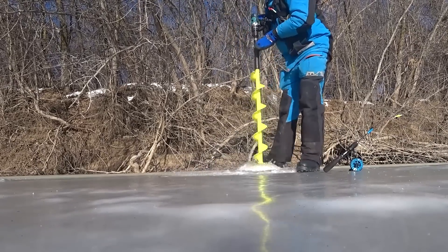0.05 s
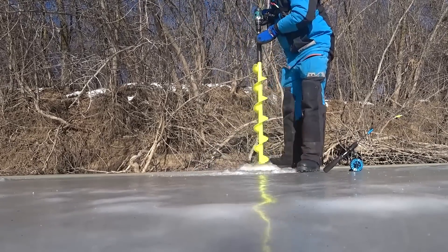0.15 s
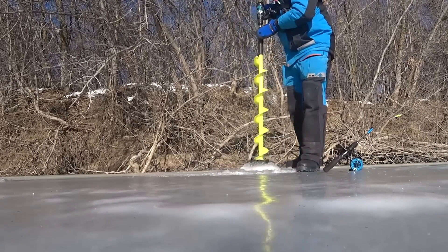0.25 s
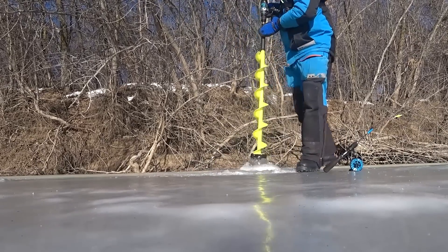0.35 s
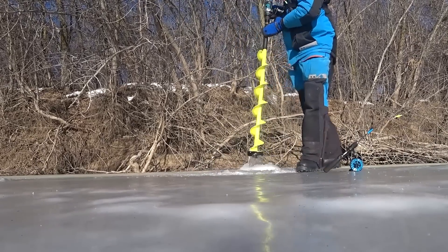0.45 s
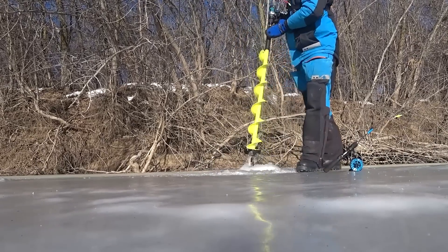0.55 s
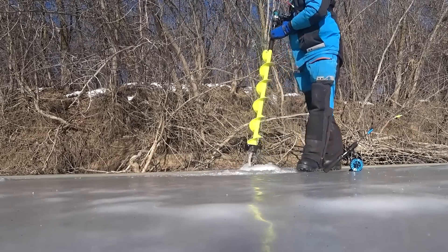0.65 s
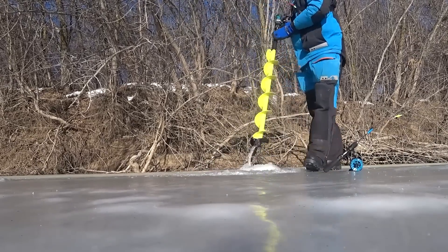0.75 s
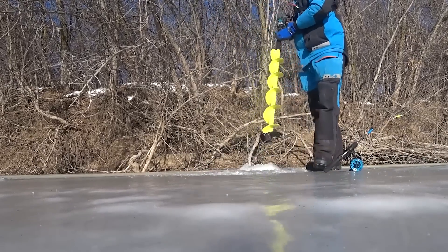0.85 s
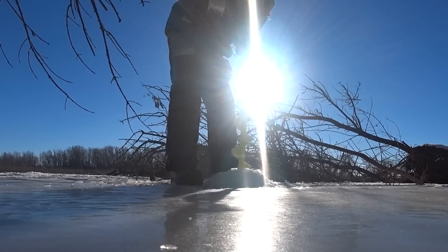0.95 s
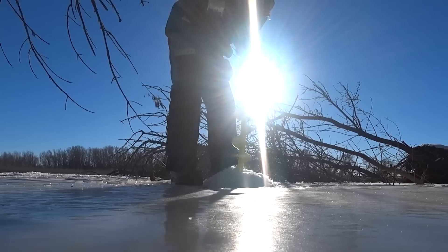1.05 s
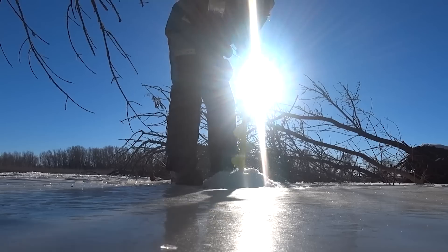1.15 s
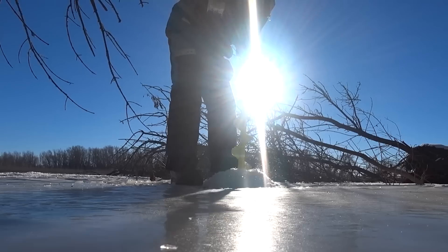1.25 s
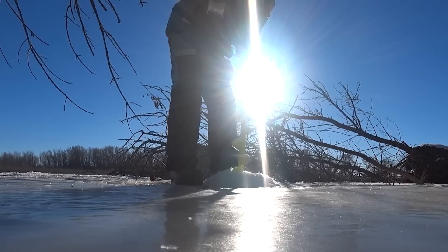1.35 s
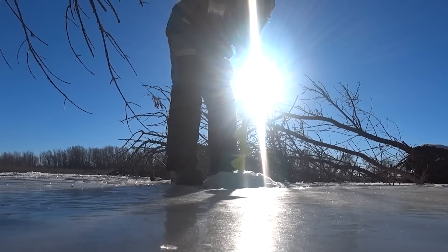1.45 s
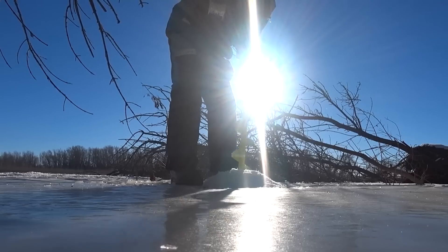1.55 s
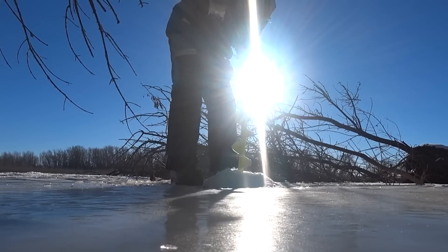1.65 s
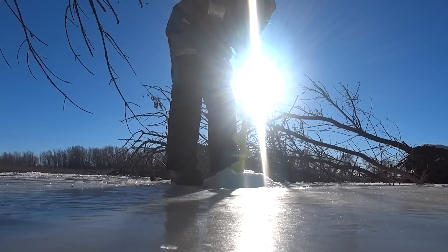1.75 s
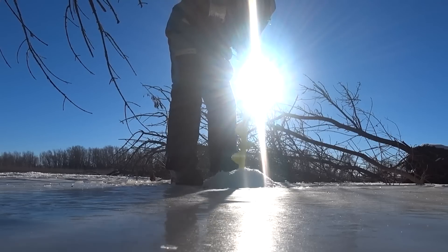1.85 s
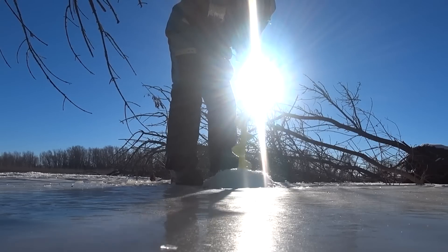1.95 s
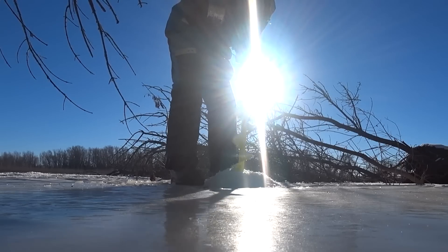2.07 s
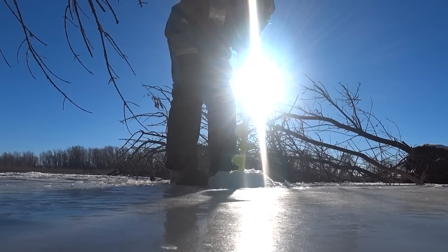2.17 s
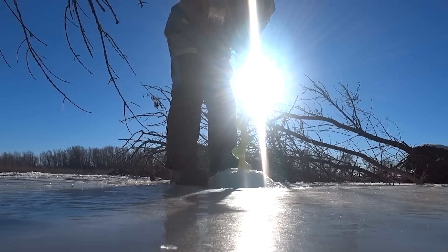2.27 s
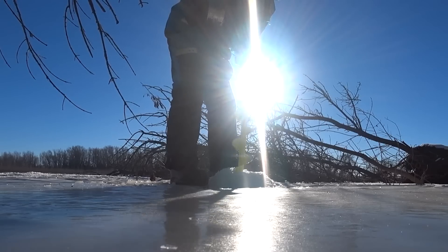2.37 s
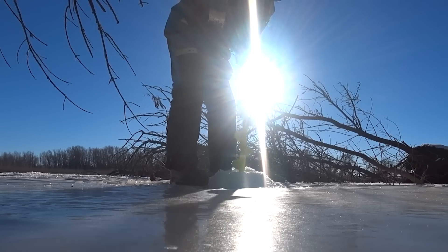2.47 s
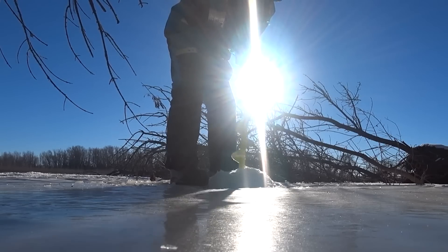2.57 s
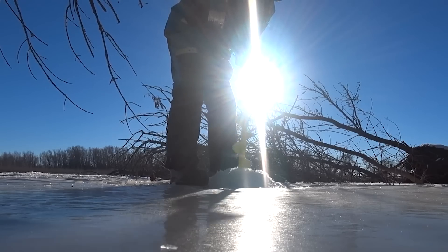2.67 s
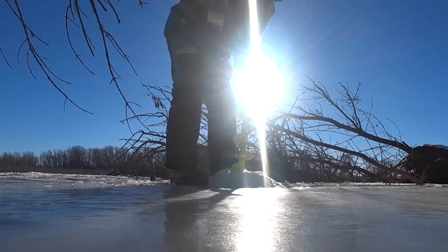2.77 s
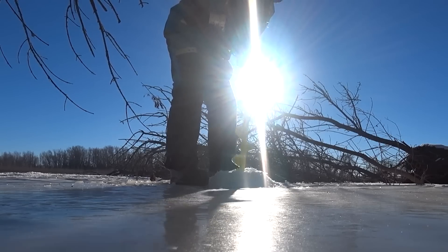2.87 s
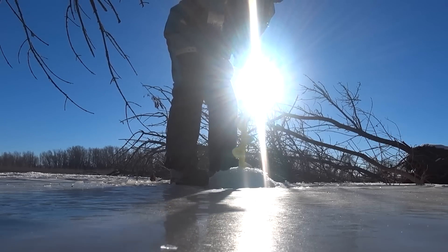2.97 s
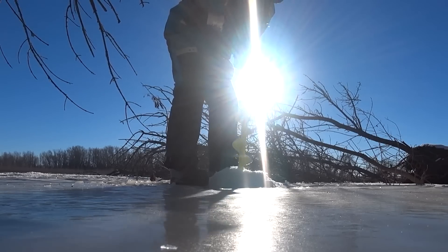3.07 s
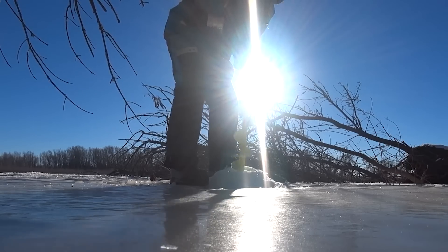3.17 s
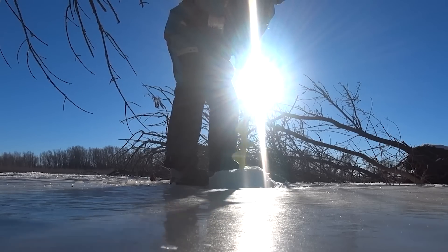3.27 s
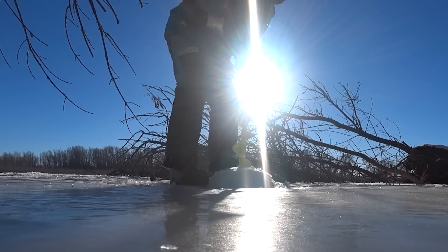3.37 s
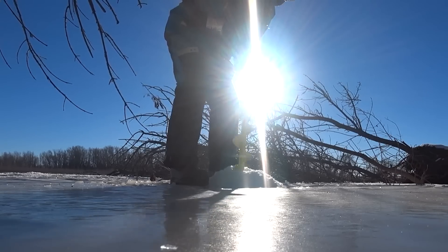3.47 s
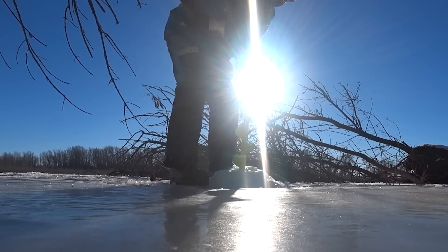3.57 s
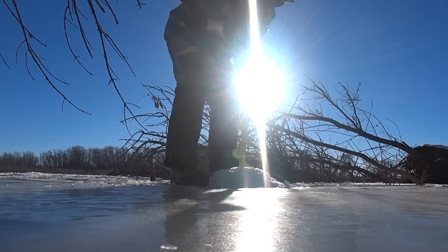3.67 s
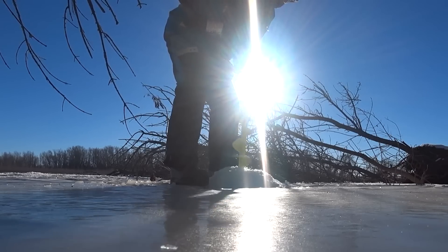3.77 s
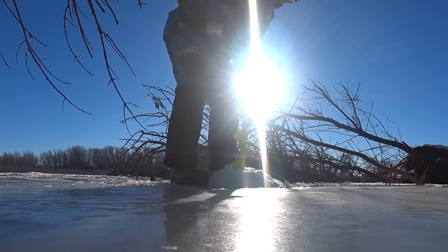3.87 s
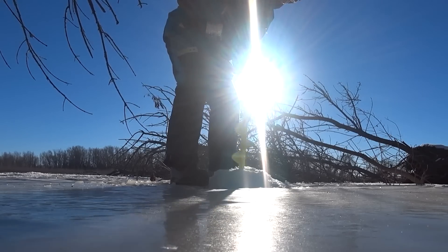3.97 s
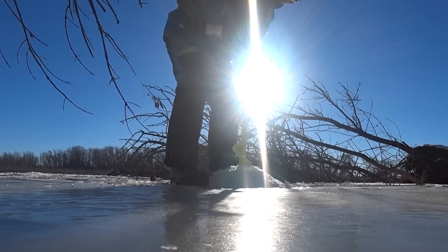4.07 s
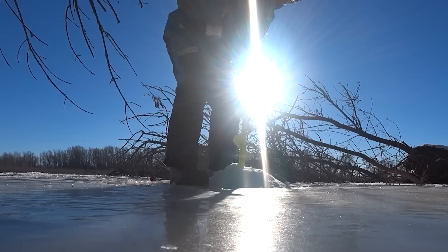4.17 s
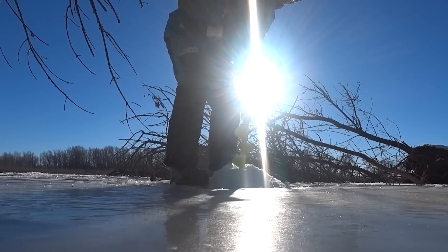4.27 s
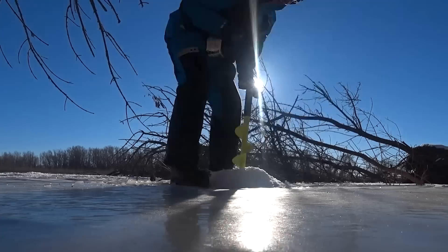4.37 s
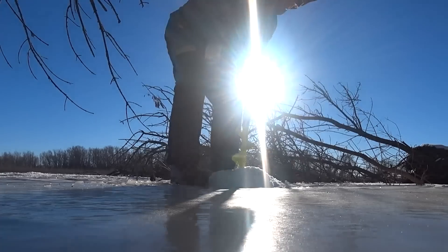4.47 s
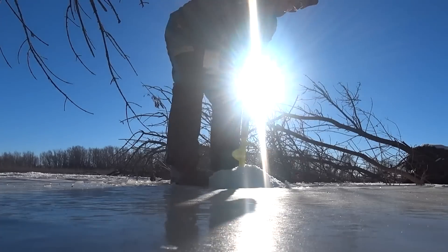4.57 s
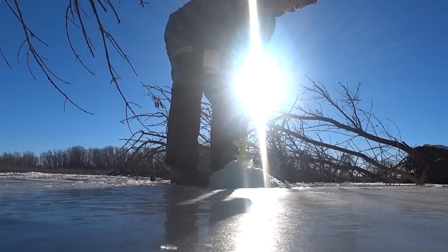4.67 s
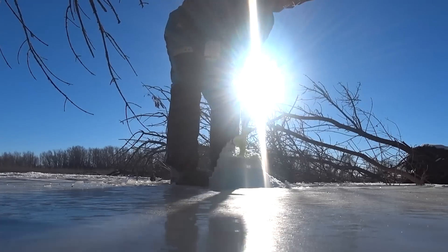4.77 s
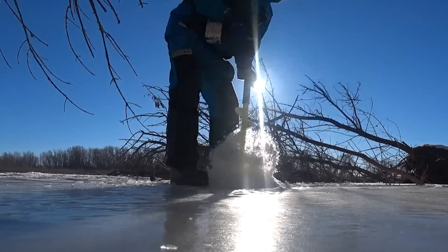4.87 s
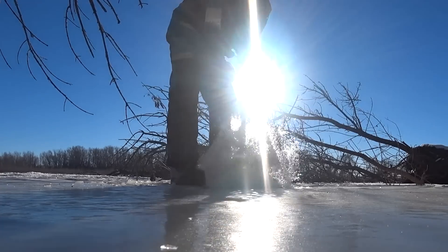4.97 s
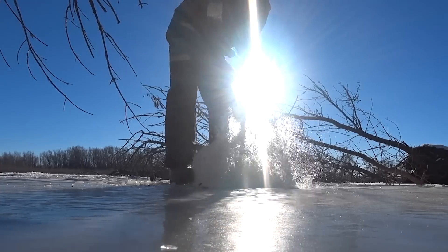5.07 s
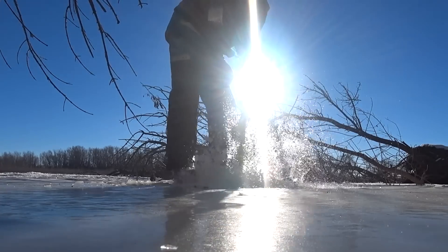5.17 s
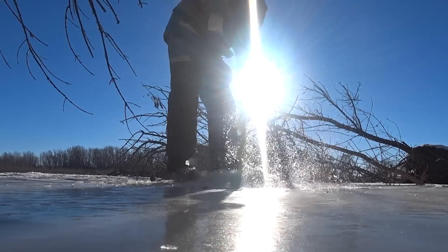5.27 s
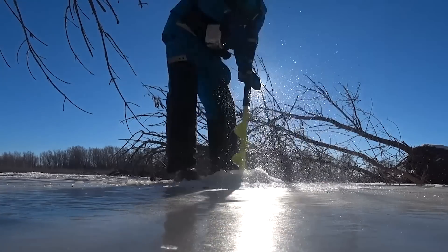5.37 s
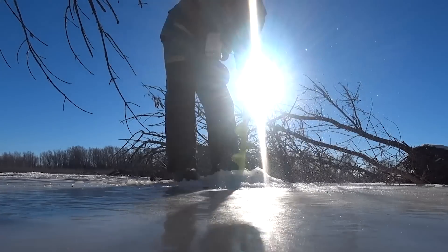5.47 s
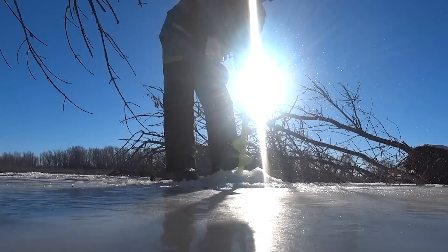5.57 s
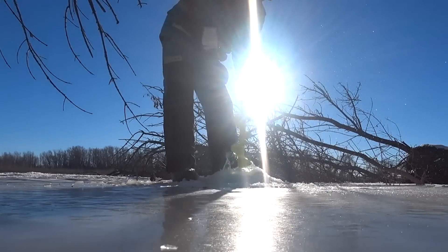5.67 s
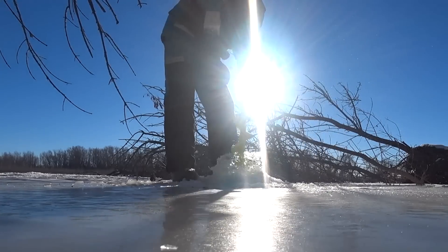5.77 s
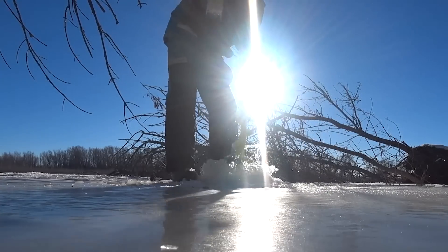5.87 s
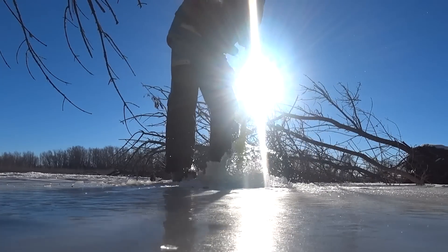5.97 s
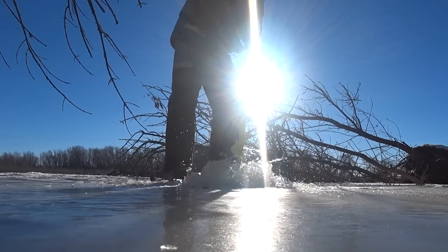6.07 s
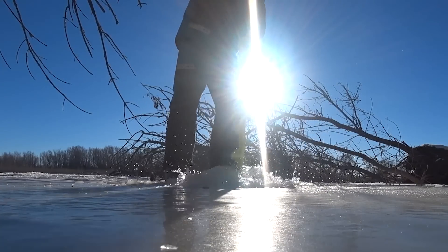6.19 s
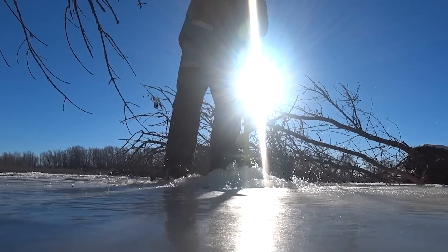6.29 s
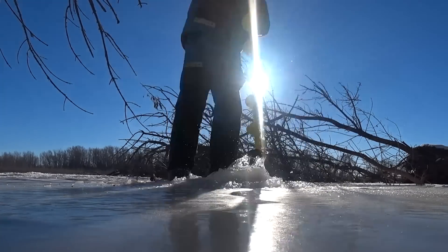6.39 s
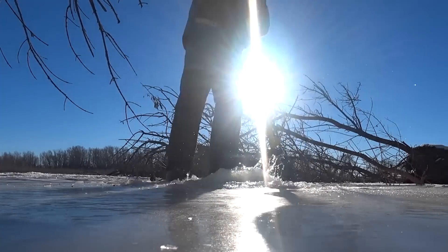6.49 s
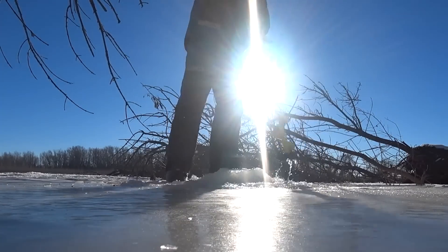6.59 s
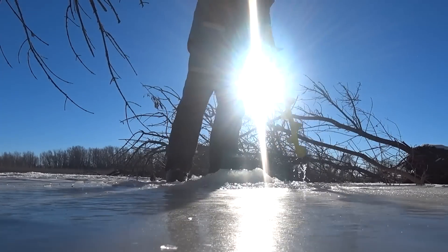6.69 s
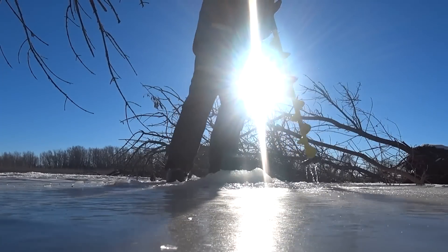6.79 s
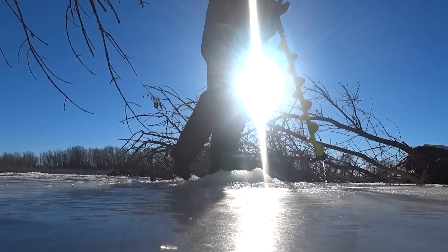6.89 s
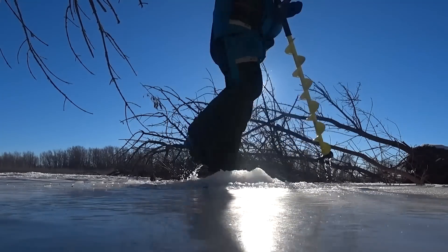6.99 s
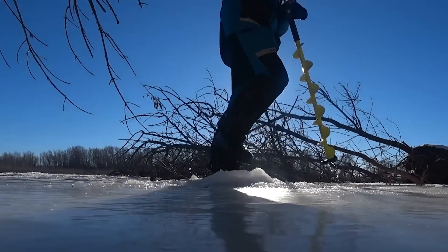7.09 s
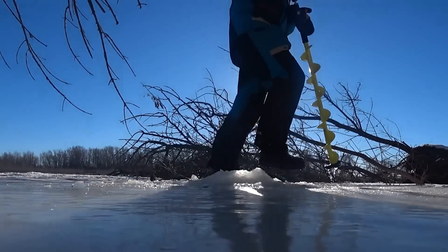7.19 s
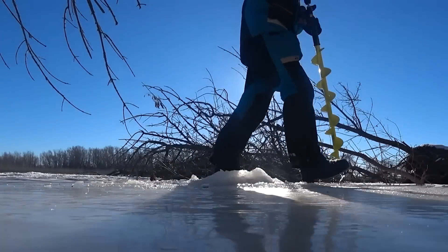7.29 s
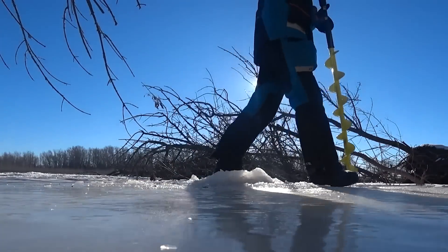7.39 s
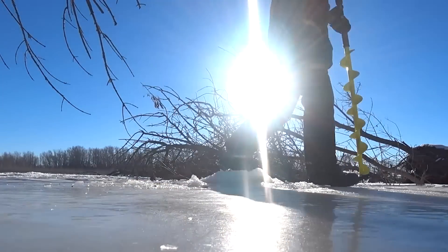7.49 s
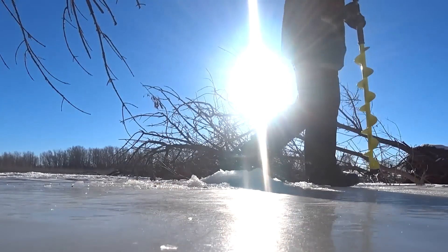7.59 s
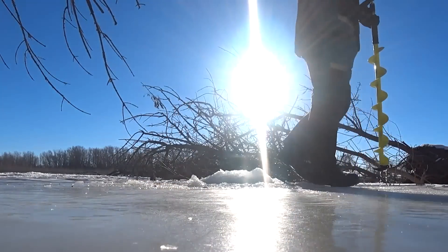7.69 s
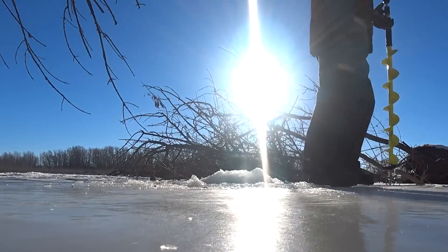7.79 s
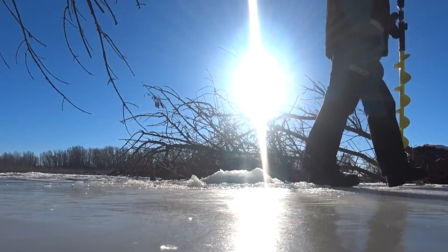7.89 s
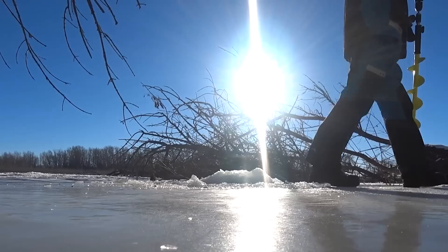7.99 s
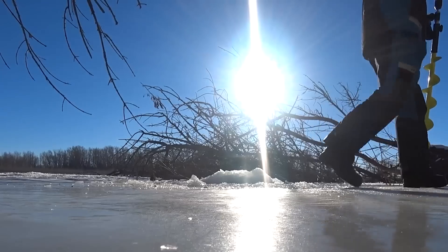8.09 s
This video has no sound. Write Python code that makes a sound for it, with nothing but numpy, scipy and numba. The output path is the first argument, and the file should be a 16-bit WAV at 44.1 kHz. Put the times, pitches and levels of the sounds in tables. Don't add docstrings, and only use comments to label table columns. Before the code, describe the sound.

Outdoors on a frozen river, close microphone with low wind rumble. Water dribbles and ticks for one second, then suddenly a cordless drill's strained gear whine and dense ice-grinding crunch. The blades punch through with a low boom, the motor races higher, slush slaps and water gurgles. The motor stops; drops tick on the ice and a few crusty footsteps move off to the right.

```python
import sys
import numpy as np
from scipy import signal
from scipy.fft import rfft, irfft, next_fast_len
from scipy.io import wavfile
from scipy.ndimage import uniform_filter1d
from numba import njit

SR = 44100
rng = np.random.default_rng(int(sys.argv[2]) if len(sys.argv) > 2 else 0)


def field_ratio(decibels):
    return 10 ** (np.asarray(decibels, dtype=float) / 20)


def generate_wav(sig):
    pcm = np.round(np.clip(np.atleast_2d(sig).T, -1, 1) * 32767).astype(np.int16)
    wavfile.write(sys.argv[1], SR, pcm)


N = 358974
T = np.arange(N) / SR
CUT_S, CUT_ENDS_S = .9798, 4.4
TURN_HZ, HEAVY_BLADE_S = 2.916, 1.503
# (frequency [Hz], level [dB per Hz])
SLUSH_COLOUR = [(71, -20), (120, -18.5), (242, -11), (304, -10), (1040, -4), (2070, -2.5), (2970, 2),
                (3390, -3), (6100, -0.5), (10600, -11.5), (11200, -26), (14600, -58), (22000, -120)]


def curve(table):
    s, *columns = np.vstack(table).T
    gate = uniform_filter1d(1. * ((T >= s[0] - .01) & (T < s[-1] + .01)), size=64)
    return [np.interp(T, s, c) for c in columns] + [gate]


def at_hz(points, hz):
    f, db = np.transpose(points)
    return np.interp(np.log(hz + 1), np.log(f), db)


def unit(x):
    return x / np.sqrt(np.mean(x ** 2))


def colour(x, points):
    size = next_fast_len(len(x))
    hz = np.arange(size // 2 + 1) * SR / size
    return irfft(rfft(x, size) * field_ratio(at_hz(points, hz)), size)[:len(x)]


def walk(rate_hz, t=T):
    return 1.2 * np.interp(t * rate_hz, np.arange(4096), rng.standard_normal(4096))


@njit
def svf(x, hz, width_hz):
    y, band, low = np.empty(len(x)), 0., 0.
    for i in range(len(x)):
        g, k = np.tan(np.pi * hz[i] / SR), width_hz / hz[i]
        v = (band + g * (x[i] - low)) / (1 + g * (g + k))
        band, low, y[i] = 2 * v - band, low + 2 * g * v, k * v
    return y


def resonant_noise(hz, width_hz):
    once = svf(rng.standard_normal(N), hz, 1. * width_hz)
    return unit(svf(once, hz, 1. * width_hz))


def grains(control, points, rate_hz, spread_db, smear_s, hiss, flicker_db):
    treble_db, bass_db, gate = control
    on = np.flatnonzero(gate)
    n, size = len(on), next_fast_len(len(on))
    cracks = (rng.random(N) < rate_hz / SR) * field_ratio(spread_db * np.minimum(rng.exponential(size=N), 3))
    tails = signal.lfilter([1], [1, -np.exp(-1 / (smear_s * SR))], cracks[on])
    hz = np.arange(size // 2 + 1) * SR / size
    spectrum = rfft((hiss + unit(tails)) * rng.standard_normal(N)[on], size) * field_ratio(at_hz(points, hz))
    treble = np.linalg.norm(spectrum[(hz > 3300) & (hz < 10000)]) * np.sqrt(2) / size
    bass = np.linalg.norm(spectrum[(hz > 250) & (hz < 1600)]) * np.sqrt(2) / size
    out = np.zeros(N)
    for centre_hz in 80 * 2 ** (np.arange(16) / 2):
        bell = np.cos(np.pi / 2 * np.clip(2 * np.log2((hz + 1) / centre_hz), -1, 1)) ** 2
        bass_share = np.clip(np.log2(3300 / centre_hz), 0, 1)
        tilt = (field_ratio(bass_db[on]) / bass) ** bass_share / treble ** (1 - bass_share)
        level = field_ratio(treble_db[on] + flicker_db * walk(25., T[on]))
        out[on] += irfft(spectrum * bell, size)[:n] * tilt * level
    return out * gate


def rings(level_db, span_s, count, lo_hz, hi_hz, cycles, glide):
    out, t = np.zeros(N + 2048), np.arange(2048) / SR
    for when, pitch, size in rng.random((count, 3)):
        i = int((span_s[0] + when * (span_s[1] - span_s[0])) * SR)
        hz = lo_hz * (hi_hz / lo_hz) ** pitch
        u = t * hz / cycles
        swell = u * np.exp(1 - u)
        out[i:i + 2048] += field_ratio(level_db[i] - 10 * size) * swell * np.sin(2 * np.pi * hz * t * (1 + glide * u))
    return out[:N]


def bursts(table, attack_s, fall_db_s, end_s):
    treble = bass = 1e-16
    for s, hold_s, db, bass_db in table:
        rise = np.clip((T - s) / attack_s + 1, 0, 1) ** 2
        power = rise * field_ratio(2 * (db - fall_db_s * np.clip(T - s - hold_s, 0, None)))
        treble, bass = treble + power, bass + power * field_ratio(2 * bass_db)
    gate = 1. * ((T >= table[0][0] - attack_s) & (T < end_s))
    return 10 * np.log10(treble), 10 * np.log10(bass / treble), gate


def ticks(table, cycles, crack, tail_s, tail_db):
    out, t = np.zeros(N + 4096), np.arange(4096) / SR
    for s, db, hz, bass_db in table:
        noise = rng.standard_normal(4096)
        ring = np.sin(2 * np.pi * hz * t) * np.exp(-t * hz / cycles)
        spray = noise * (crack * np.exp(-t / 0.00021) + field_ratio(tail_db) * np.exp(-t / tail_s))
        knock = field_ratio(bass_db) * np.sin(2 * np.pi * 450. * t) * np.exp(-t / .0035)
        i = int(s * SR)
        out[i:i + 4096] += field_ratio(db) * (ring + spray + knock)
    return out[:N]


def stack(mesh_hz, orders, wobble, flutter_db):
    phase = 2 * np.pi * np.cumsum(mesh_hz * (1 + wobble * walk(90.))) / SR
    lines = []
    for k, db in orders:
        level = np.sqrt(2) * field_ratio(db + flutter_db * walk(60.))
        lines.append(level * np.sin(k * phase) * (k * mesh_hz < .45 * SR))
    return lines


def gear_hiss(hz, db):
    hz = hz * (1 + .03 * walk(12.))
    return resonant_noise(hz, 500) * field_ratio(db + 4 * walk(22.))


def housing(hz):
    # (centre [Hz], width [Hz])
    shell = (2550., 800.)
    centre_hz, width_hz = shell
    return 1 / (1 + (2 * (hz - centre_hz) / width_hz) ** 2) + .14 * (hz > centre_hz)


def loaded_speed():
    # (time [s], mesh rate [Hz])
    speed = [(.98, 650), (1.14, 638.5), (1.5, 612), (1.7, 600), (2.45, 588), (2.62, 575.3), (3.15, 570.6),
             (3.55, 584.4), (4.2, 612), (4.385, 635)]
    # (bite time [s], run-up [Hz], run-up length [s])
    slips = [(1.165, 28, .03), (1.27, 70, .17), (1.575, 52, 0.096), (1.71, 22, .06), (1.9, 61.5, .15),
             (2.055, 20, .05), (2.209, 40.7, 0.089), (2.42, 25.4, .18), (2.532, 44, .06), (2.7, 22, .06),
             (2.95, 32.7, .3), (3.44, 35.7, 0.28), (3.621, 42, .06), (3.8, 17.2, .14), (3.95, 18, .1),
             (4.11, 26, .1), (4.27, 45, .07)]
    hz, gate = curve(speed)
    run_up = 0
    for s, up_hz, run_s in slips:
        run_up = run_up + np.interp(T, [s - run_s, s - .6 * run_s, s, s + .05], [0, .7 * up_hz, up_hz, 0])
    return hz + run_up, gate


def loaded_drill():
    # (mesh multiple, level [dB re strongest])
    orders = [(1, -21), (2, -19), (3, -18), (4, 0.), (5, -14), (6, -18), (9, -11), (12, -17)]
    # (time [s], level change [dB], half length [s])
    level_moves = [(1.12, -8, .03), (1.21, 7, .08), (1.56, 3, .06), (1.86, 3, .06), (2.45, -8, .03),
                   (2.72, -8, .025), (3.1, -8, .08), (3.5, -7, .04), (3.66, -4, .03)]
    hz, gate = loaded_speed()
    move_db = sum(np.interp(T, [s - half_s, s, s + half_s], [0, db, 0]) for s, db, half_s in level_moves)
    shell = 0.29 + 0.64 / np.sqrt(1 + (2 * (4 * hz - 2425) / 195) ** 2)
    level_db = -33 + 2.05 * (T - CUT_S) - 7 * (T > 4.22)
    whine = sum(stack(hz, orders, wobble=0.009, flutter_db=2.0)) * field_ratio(move_db + level_db) * shell
    return (whine + gear_hiss(9 * hz, -40.5)) * gate


def free_drill():
    # (time [s], mesh rate [Hz], level [dB])
    free = [(4.395, 920, -36), (4.446, 986, -31), (4.5, 866, -27), (4.565, 981, -34), (4.62, 943, -27.5),
            (4.69, 866, -37), (4.79, 916, -30), (4.924, 945, -35), (4.955, 893, -41), (5.024, 1007, -37),
            (5.12, 1019, -34), (5.23, 1035, -43)]
    # (time [s], mesh rate [Hz], level [dB])
    sag = [(5.255, 1010, -39), (5.285, 925, -36), (5.35, 765, -43), (5.422, 552, -33), (5.45, 615, -25),
           (5.475, 770, -42), (5.497, 925, -35), (5.52, 972, -29)]
    # (time [s], mesh rate [Hz], level [dB])
    last = [(5.6, 969, -27.5), (5.644, 922, -33), (5.7, 953, -31), (5.8, 985, -38), (5.92, 994, -50),
            (6.0, 990, -55), (6.08, 883, -54)]
    shell_orders = [(3, 0.), (4, 1.5), (5, -14)]
    vent_orders = [(6, 1.), (9, 2.5), (12, -3.5)]
    hz, db, gate = curve([free, sag, last])
    hz = uniform_filter1d(hz, size=500)
    lines = stack(hz, shell_orders, wobble=.009, flutter_db=3.5)
    gains = [housing(k * hz) for k, _ in shell_orders]
    gains[0] = gains[0] * field_ratio(-.05 * np.clip(860 - hz, 0, None))
    low = sum(v * g for v, g in zip(lines, gains)) / np.max(gains, axis=0)
    upper = 0
    for line, (k, _) in zip(stack(hz, vent_orders, wobble=.011, flutter_db=3.5), vent_orders):
        vent = np.minimum(np.minimum(k * hz / 5050, 8250 / (k * hz)), 1) ** 9
        upper = upper + line * vent
    upper = upper + gear_hiss(6 * hz, 0) * np.minimum(hz / 900, 1) ** 4
    upper_db = -43 + 1.5 * walk(12.) - 7 * np.clip(T - 5.9, 0, None) / .1
    return (low * field_ratio(db - 3.5) + upper * field_ratio(upper_db)) * gate


def blade_turn():
    return np.cos(2 * np.pi * TURN_HZ * (T - HEAVY_BLADE_S))


def grind():
    lift = np.clip((T - CUT_ENDS_S) / 0.039 + 1, 0, 1)
    swell_db = 0 * blade_turn()
    gate = uniform_filter1d(1. * ((T >= CUT_S - .01) & (T < CUT_ENDS_S)), size=64)
    treble_db = -28.5 - 0.26 * (T - CUT_S) + 2.5 * lift - 0.13 * swell_db
    return treble_db, -8 + swell_db, gate


def auger(cut):
    # (centre [Hz], width [Hz], level [dB re cutting], swell per turn [dB])
    modes = [(612, 65, -19, 3.5), (940, 270, -19.5, 9.5), (3140, 440, -13, -1), (5800, 2500, -9, 1.5),
             (7570, 550, -17, 0)]
    db, _, gate = cut
    turn = blade_turn()
    out = 0
    for hz, width_hz, ring_db, swell_db in modes:
        centre_hz = hz * (1 + 0.042 * walk(7.))
        ring = resonant_noise(centre_hz, width_hz)
        out = out + ring * field_ratio(ring_db + swell_db * turn + 2.2 * walk(16.))
    return out * field_ratio(db) * gate


def cutting():
    # (frequency [Hz], level [dB per Hz])
    ice_colour = [(59, -38), (100, -13.5), (406, -13.5), (615, -8.5), (706, -10), (2050, -4.5), (2400, 3),
                  (2650, -1.5), (5500, 0), (7400, -2.5), (11200, -13), (14600, -100), (22000, -120)]
    cut = grind()
    ice = grains(cut, ice_colour, rate_hz=2200.0, spread_db=8.0, smear_s=0.0037, hiss=1.3, flicker_db=1.85)
    chips = rings(cut[0] - 8., (.98, 4.38), count=1100, lo_hz=793.0, hi_hz=8230.0, cycles=7.1, glide=-0.0011)
    return field_ratio(-0.6) * ice + chips + auger(cut)


def breakthrough():
    hit_s, hold_s = 4.28, .075
    boom_db = -37 - 170 * np.clip(hit_s - T, 0, None) - 280 * np.clip(T - hit_s - hold_s, 0, None)
    churn_db = np.where(T > hit_s, -50.5 - 6 * (T - hit_s), -120) - 60 * np.clip(T - 5.4, 0, None)
    noise = unit(svf(rng.standard_normal(N), np.full(N, 170.), 306.0))
    return noise * field_ratio(np.maximum(boom_db, churn_db) + 0.5 + 2.2 * walk(40.))


def thrown_level():
    # (time [s], hold [s], treble [dB], bass [dB re treble])
    throws = [(4.4, 0.46, -29, -12.5), (4.72, 0.26, -38, -4.5), (4.96, 0.15, -34, -7),
              (5.2, 0.23, -35, -10.5), (5.47, 0.099, -31, -18), (5.62, 0.016, -28.5, -7),
              (5.76, 0.019, -29.5, -1.5), (5.86, 0.18, -34, -5.5), (6.05, 0.12, -37, -6),
              (6.26, 0.065, -40, -4.5), (6.612, 0.0089, -49, -34)]
    return bursts(throws, attack_s=0.053, fall_db_s=51, end_s=10.0)


def slush(thrown):
    wet = grains(thrown, SLUSH_COLOUR, rate_hz=380.0, spread_db=4.0, smear_s=0.0047, hiss=1.0, flicker_db=2.0)
    beads = rings(thrown[0] + 5, (5.9, 6.9), count=380, lo_hz=1000, hi_hz=8000, cycles=3, glide=0)
    return field_ratio(-3.0) * wet + beads


def splashes():
    # (time [s], peak [dB])
    slaps = [(4.4563, -7.5), (4.615, -26), (4.6847, -11), (4.715, -11.5), (4.835, -8), (4.925, -6),
             (5.084, -5), (5.115, -7), (5.223, -31), (5.2472, -9.5), (5.62, -10), (5.7593, -11), (5.78, -3),
             (5.867, -4), (5.9264, -9), (5.964, -10), (6.018, -11), (6.045, -15), (6.1389, -10),
             (6.188, -13), (6.216, -22), (6.2621, -20), (6.3, -30), (6.34, -28), (6.612, -24)]
    hits = np.zeros(N)
    s, db = np.transpose(slaps)
    hits[(s * SR).astype(int)] = field_ratio(db - 17.0)
    shape = np.exp(-T[:4096] / 0.017) * (1 - np.exp(-T[:4096] / 0.0025))
    return signal.fftconvolve(hits, shape)[:N] * unit(colour(rng.standard_normal(N), SLUSH_COLOUR))


def gurgle(thrown):
    # (time [s], peak [dB], pitch [Hz])
    bubbles = [(.388, -43, 517), (4.962, -25.5, 608), (4.989, -26, 567), (5.029, -23, 479),
               (5.078, -20, 479), (5.634, -20, 763), (5.699, -30, 765), (5.751, -23.5, 358),
               (5.829, -33, 343), (5.871, -19.5, 679), (5.899, -27.5, 400), (5.939, -20, 883),
               (5.979, -26.5, 361), (6.018, -20, 1200), (6.059, -31, 423), (6.122, -25.5, 582),
               (6.159, -31.5, 545)]
    # (time [s], resonance [Hz], level [dB])
    filling = [(.03, 760, -52), (.09, 727, -49), (.13, 855, -43), (.21, 1060, -45), (.24, 1110, -81)]
    out, t = np.zeros(N + 8192), np.arange(8192) / SR
    shake = 0.066 * walk(60.)
    for s, db, hz in bubbles:
        i = int(s * SR)
        ring_s = 0.026 + 13.4 / hz
        swell = (1 - np.exp(-t / 0.0026)) * field_ratio(-60 * t / ring_s / 2)
        phase = 2 * np.pi * hz * np.cumsum(1 + 0.21 * t + shake[i:i + 8192]) / SR
        out[i:i + 8192] += 0.85 * field_ratio(db) * swell * np.sin(phase)
    treble_db, bass_db, _ = thrown
    small = rings(treble_db + bass_db - 2.0, (4.85, 6.22), count=260, lo_hz=318.3, hi_hz=1588.0,
                  cycles=7.0, glide=0.03)
    hz, db, gate = curve(filling)
    return out[:N] + small + resonant_noise(hz, 130) * field_ratio(db - 2.0) * gate


def drip():
    # (time [s], hold [s], treble [dB], bass [dB re treble])
    runs = [
        (0, 0.014, -39.5, -4.5),
        (.12, 0.015, -47.5, -8),
        (.41, 0.019, -53.5, -3),
        (.7, .02, -86, -12),
        (.93, 0.034, -61, -15),
    ]
    # (frequency [Hz], level [dB per Hz])
    drip_colour = [(120, -39), (200, -4.5), (606, -5.5), (908, -5.5), (1190, -2), (5480, -5.5),
                   (11100, -17), (14400, -62), (22000, -120)]
    level = bursts(runs, attack_s=0.038, fall_db_s=66, end_s=0.86)
    return grains(level, drip_colour, rate_hz=350.0, spread_db=2.5, smear_s=0.0041, hiss=1.0, flicker_db=0.5)


def boots():
    # (time [s], hold [s], treble [dB], bass [dB re treble])
    footfalls = [(6.9, 0.011, -52.5, -7), (6.965, 0.042, -59.5, 6), (7.106, 0.0043, -43.5, -1.5),
                 (7.12, .06, -66, -6), (7.388, 0.043, -45.5, -7), (7.44, 0.026, -50, 3.5),
                 (7.79, 0.02, -51.5, -3), (7.86, .01, -66, 5), (7.943, .012, -41, -2.5),
                 (7.955, 0.024, -50, 1.5), (8.06, 0.032, -60, 1)]
    # (frequency [Hz], level [dB per Hz])
    crunch_colour = [(88, -35), (150, -3.5), (173, -17), (443, -8), (1150, -11), (6880, -21), (11200, -34),
                     (14600, -59), (22000, -120)]
    treble_db, bass_db, gate = bursts(footfalls, attack_s=0.0075, fall_db_s=223, end_s=9)
    crust = rings(treble_db + bass_db + 3.2, (7.94, 8.03), count=45, lo_hz=304, hi_hz=905, cycles=2.2, glide=0)
    grit = rings(treble_db + 1.6, (6.9, 8.1), count=500, lo_hz=1390, hi_hz=4480, cycles=1.2, glide=0)
    crunch = grains((treble_db - 1.5, bass_db - 1.5, gate), crunch_colour, rate_hz=1300.0, spread_db=8.5,
                    smear_s=0.0013, hiss=0.24, flicker_db=-0.8)
    return crust + grit + crunch


def drops_and_crumbs():
    # (time [s], peak [dB], ring [Hz],
    # bass [dB re peak])
    drops_crumbs = [(0.0166, -23.5, 4430, -23), (0.1595, -29.5, 2130, -16), (0.1804, -31, 3900, -18),
                    (0.3793, -36, 1260, -21), (0.4152, -41, 2950, -2), (0.4342, -31, 2880, -22),
                    (0.4803, -32, 3280, -24), (0.603, -48, 1420, -19), (0.62, -30, 5650, -34),
                    (0.6456, -43, 1570, -16), (0.7272, -46.5, 1530, -36), (0.7617, -47, 4260, -17),
                    (0.7806, -40, 6590, -16), (0.835, -38, 4730, -29), (0.938, -39, 1500, -18),
                    (6.3986, -27.5, 2670, -25), (6.4438, -32, 2100, -9), (6.5252, -34.5, 2130, -7),
            (6.5709, -33, 3970, -16), (6.616, -20.5, 4380, -38), (6.6985, -32, 4770, -35),
            (6.8353, -36, 5370, -34), (6.909, -31.5, 5400, -32), (7.0311, -42, 4160, -17),
            (7.0827, -31, 6930, -22), (7.1063, -29.5, 2740, -36), (7.161, -32, 5030, -20),
            (7.1857, -54, 3710, -10), (7.274, -39.5, 1300, -0.5), (7.3176, -27, 8550, -35),
            (7.3546, -36, 8900, -20), (7.386, -40, 2810, -4), (7.417, -33, 3670, -28),
            (7.4362, -31, 1540, -28), (7.497, -36, 2630, -27), (7.6547, -35, 4430, -14),
            (7.742, -44, 4270, -5), (7.79, -35, 3000, -27), (7.8135, -23.5, 5440, -27),
            (7.8612, -45, 1720, -2), (7.9416, -43, 2240, 4), (8.0652, -47, 4730, 1),
            (8.0652, -45, 1210, -9)]
    heels = [(6.965, -44, 600, -6), (7.275, -41.5, 525, -1), (7.387, -41, 610, -3), (7.474, -35.5, 545, -6),
             (7.513, -41, 2960, -24), (7.719, -61, 452, -19), (7.759, -52, 330, -10),
             (7.825, -35, 2090, -23), (8.08, -46, 506, -15), (8.094, -59, 595, -22)]
    single_drops = [(.004, -37, 1030, -30), (.161, -32, 945, -30), (.187, -33.5, 1110, -30),
                    (.46, -38, 1930, -30), (.521, -42, 3600, -30), (.529, -47, 1440, -30),
                    (.547, -57, 1290, -30), (.554, -39, 7200, -30), (.57, -48, 2500, -30),
                    (.727, -41, 6300, -30), (.786, -45, 6800, -39), (.842, -42, 5500, -33),
                    (.884, -45, 6800, -30), (.929, -47, 9100, -35), (.9328, -38, 2380, -27),
                    (.939, -38, 3300, -30), (.955, -44, 5300, -30), (6.625, -25, 5970, -30),
                    (6.655, -29, 4860, -25), (6.668, -32, 5200, -35), (6.672, -39, 2180, -39),
                    (6.735, -37, 5100, -30), (6.775, -45, 2700, -30), (6.818, -47, 4000, -30),
                    (6.873, -48, 2700, -35), (6.958, -44, 3000, -34), (7.118, -36, 2660, -30),
                    (7.136, -48, 5000, -30), (7.17, -43, 4800, -30), (7.276, -36, 4900, -30),
                    (7.292, -43, 8500, -30), (7.402, -29, 7500, -26), (7.54, -44, 4300, -30),
                    (7.572, -46, 2900, -30), (7.6151, -43, 5220, -30), (7.657, -42, 2200, -24),
                    (7.72, -44, 2800, -30), (7.7583, -44, 5400, -30), (7.813, -39, 2240, -30),
                    (7.92, -46, 7000, -30), (8.094, -46, 3800, -30), (8.108, -51, 2200, -30)]
    hits = ticks(drops_crumbs + heels, cycles=3., crack=0.25, tail_s=0.004, tail_db=-22)
    return hits + ticks(single_drops, cycles=4.5, crack=0.1, tail_s=0.003, tail_db=-26)


def wind():
    # (time [s], level [dB])
    gusts = [(0, -42), (.37, -45.5), (.49, -38.5), (.97, -42.5), (.99, -54), (1.64, -51), (2.07, -61),
             (2.4, -48), (2.8, -60.5), (3.4, -46.5), (3.48, -44), (3.62, -49.5), (4.95, -63.5), (6.25, -58),
             (6.37, -47), (7.26, -65), (7.34, -55), (8.14, -63)]
    # (frequency [Hz], level [dB per Hz])
    rumble = [(8.8, -26), (15, 7.5), (70, -1.5), (216, -21.5), (321, -28.5), (400, -61), (520, -65),
              (880, -120)]
    db = curve(gusts)[0]
    mid, side = (unit(colour(rng.standard_normal(N), rumble)) for _ in range(2))
    return field_ratio(db + 2.5 * walk(14.)) * np.array([mid + .26 * side, 1.08 * mid - .26 * side])


def open_air():
    # (frequency [Hz], level [dB per Hz])
    air_colour = [(88, -21), (150, -3.5), (443, -7), (1020, -12), (4710, -11.5), (7810, -14), (11200, -26),
                  (14600, -52), (22000, -120)]
    return unit(colour(rng.standard_normal(N), air_colour)) * field_ratio(-59 + 0.5 * walk(19.0))


def scene():
    # (frequency [Hz], level [dB re middle])
    port_side = [(100, -10.5), (300, -16.5), (2000, -16), (5000, -16.5), (10000, -9.5)]
    # (frequency [Hz], level [dB re middle])
    port_lean = [(100, -44.5), (5000, -44), (7500, -23), (10000, -22)]
    thrown = thrown_level()
    drilling = (cutting() + loaded_drill() + free_drill()) * (T >= CUT_S)
    water = breakthrough() + slush(thrown) + splashes() + gurgle(thrown) + drip() * (T < CUT_S)
    walking = boots() + drops_and_crumbs()
    mid = drilling + water + walking + open_air()
    side = colour(mid * walk(300.), port_side) + colour(mid, port_lean)
    side = side - .16 * np.clip(T - 7.0, 0, None) * walking
    return np.array([mid + side, mid - side]) + wind()


def top_cut(x):
    return signal.sosfilt(signal.butter(12, 11360, fs=SR, output="sos"), x)


def record(dry):
    ceiling, top_hz = .36, 11280
    low_pass = signal.ellip(12, .2, 70, top_hz, fs=SR, output="sos")
    mix = signal.sosfilt(low_pass, ceiling * np.tanh(dry / ceiling))
    return top_cut(mix)


dry = scene()
out = record(dry)
generate_wav(out)
```